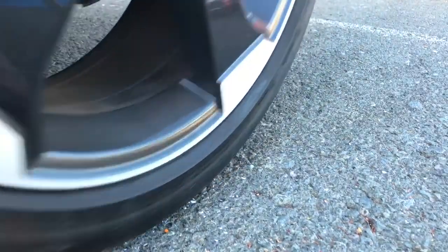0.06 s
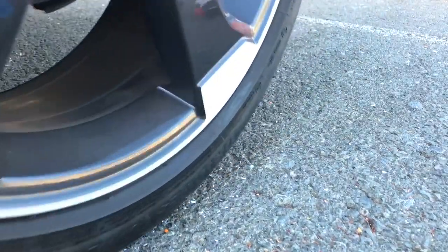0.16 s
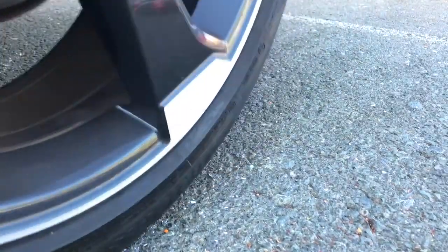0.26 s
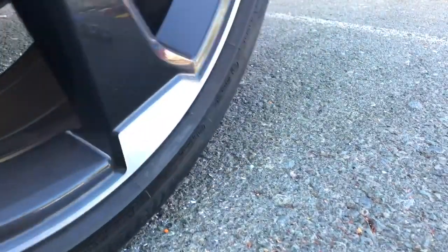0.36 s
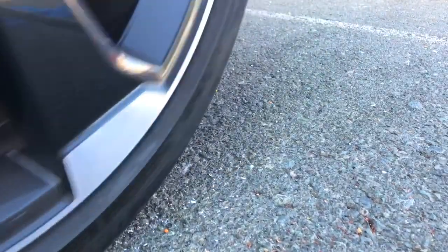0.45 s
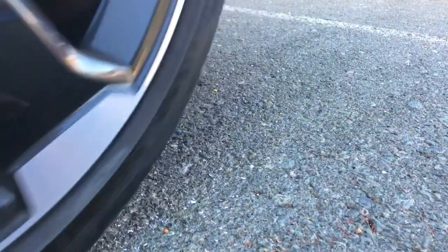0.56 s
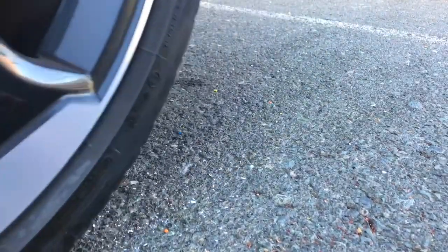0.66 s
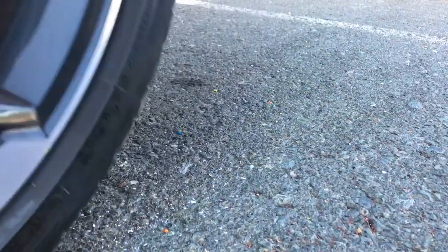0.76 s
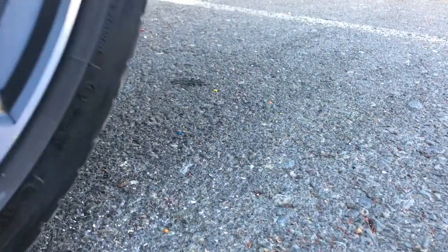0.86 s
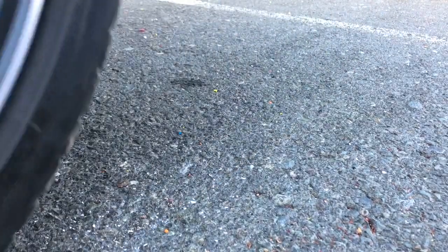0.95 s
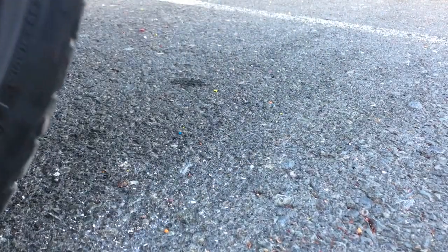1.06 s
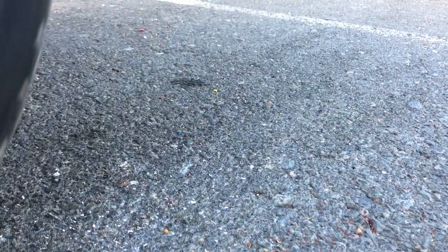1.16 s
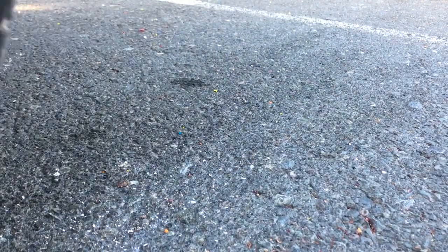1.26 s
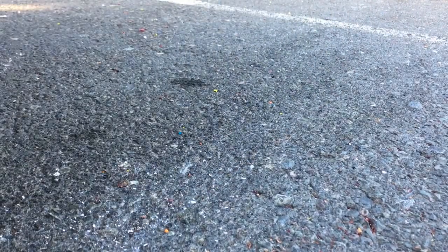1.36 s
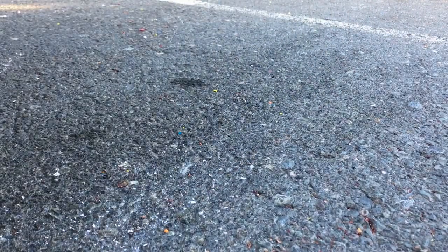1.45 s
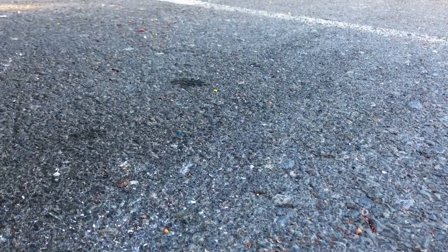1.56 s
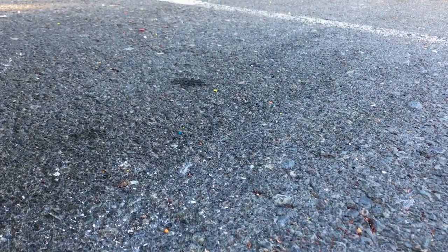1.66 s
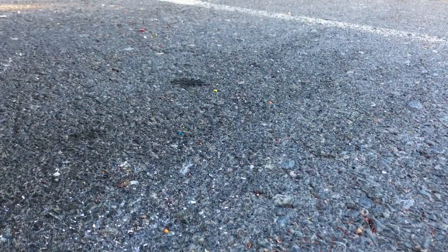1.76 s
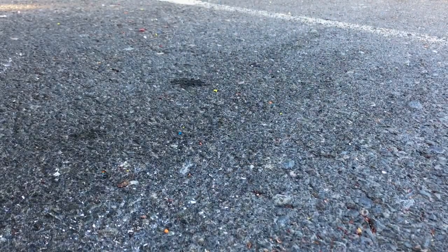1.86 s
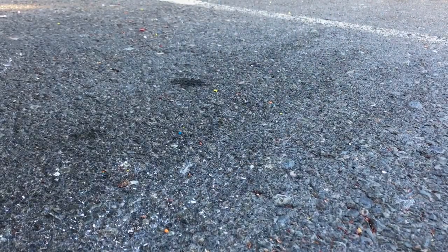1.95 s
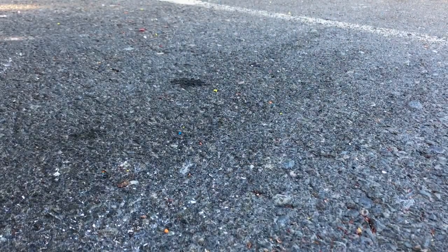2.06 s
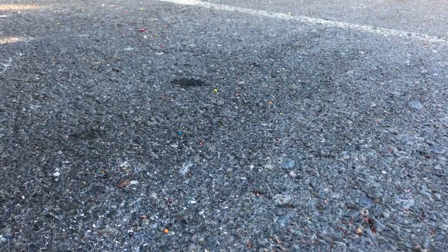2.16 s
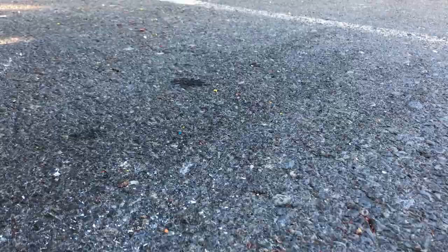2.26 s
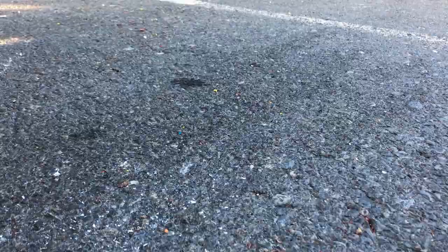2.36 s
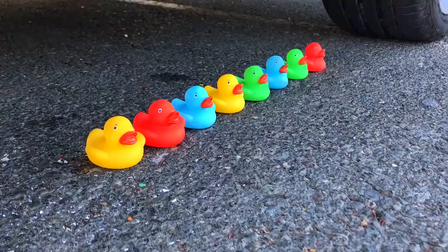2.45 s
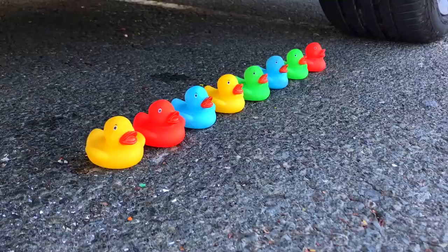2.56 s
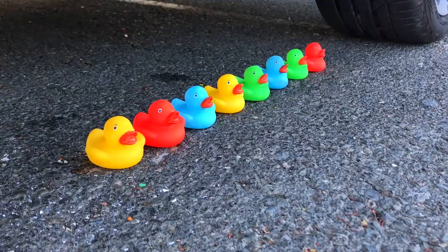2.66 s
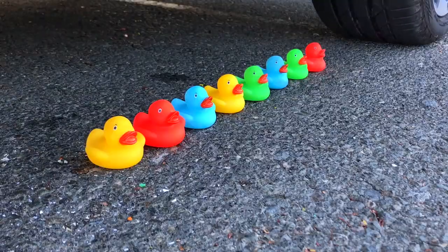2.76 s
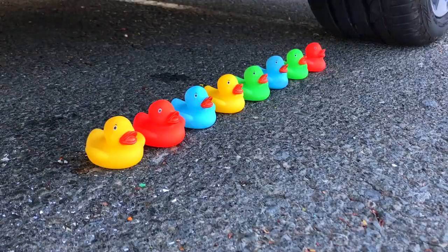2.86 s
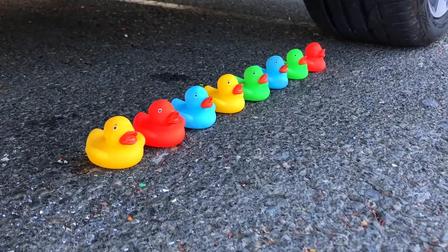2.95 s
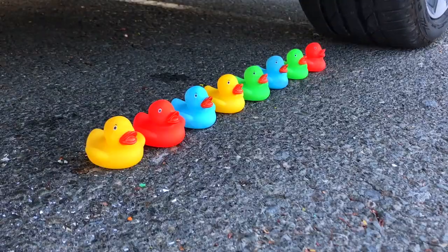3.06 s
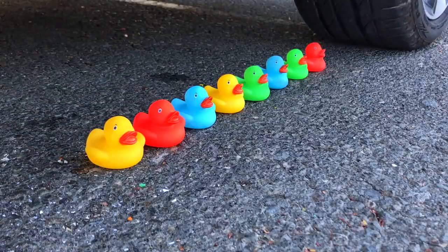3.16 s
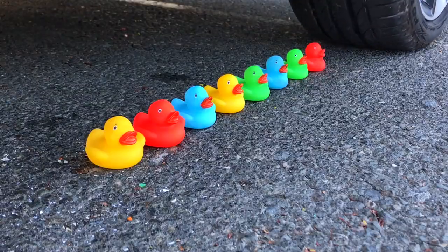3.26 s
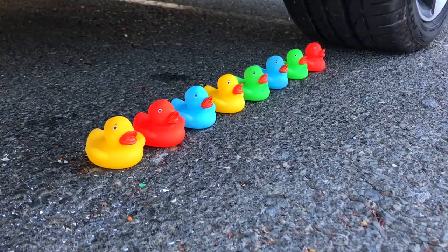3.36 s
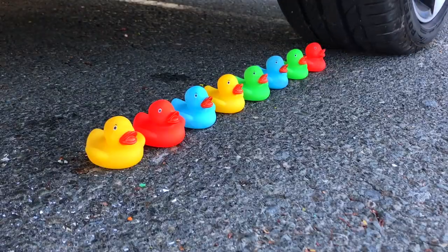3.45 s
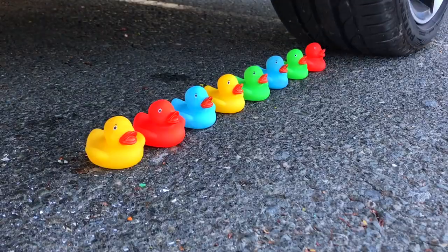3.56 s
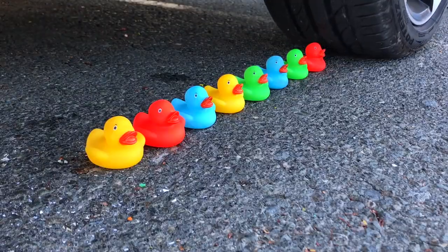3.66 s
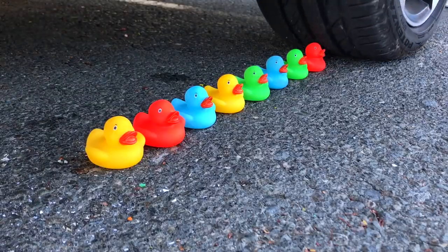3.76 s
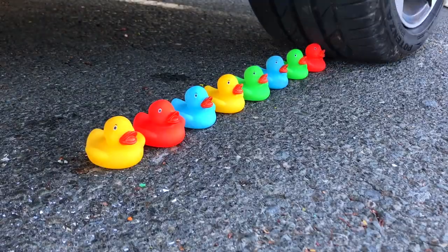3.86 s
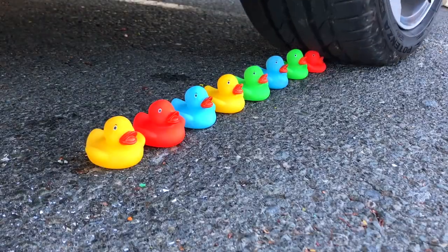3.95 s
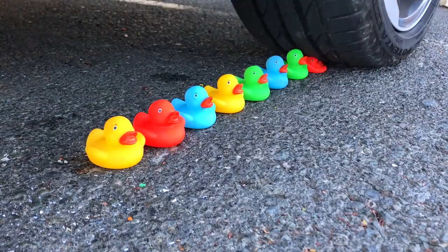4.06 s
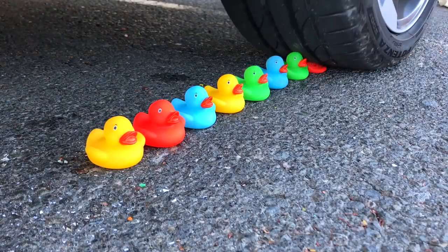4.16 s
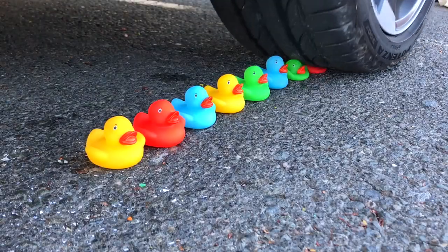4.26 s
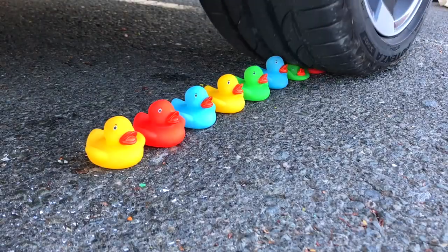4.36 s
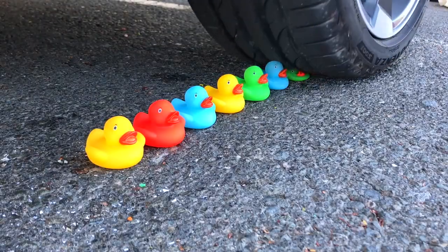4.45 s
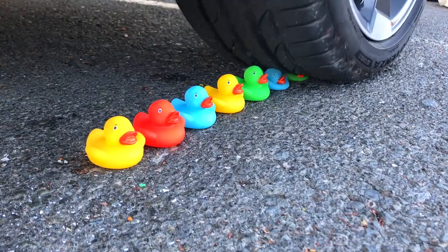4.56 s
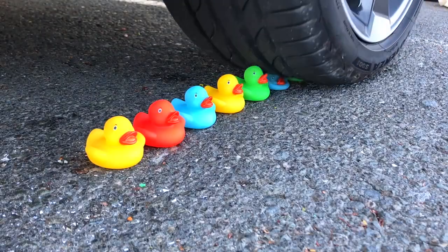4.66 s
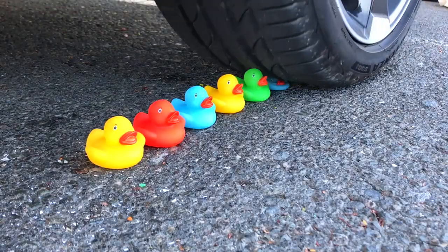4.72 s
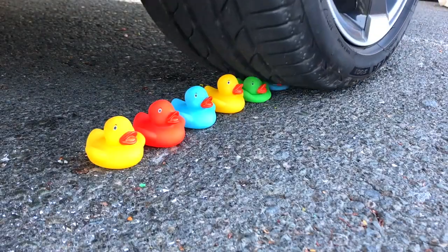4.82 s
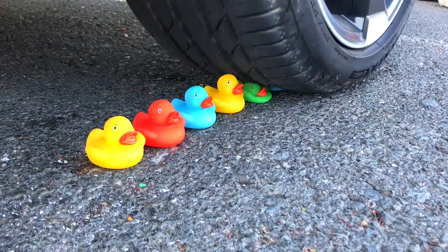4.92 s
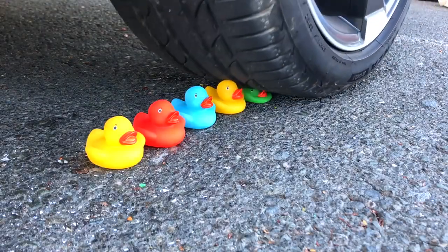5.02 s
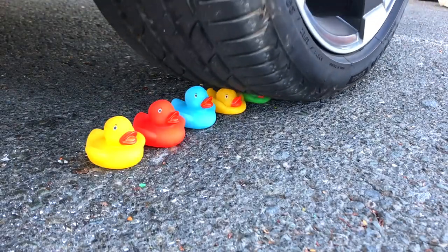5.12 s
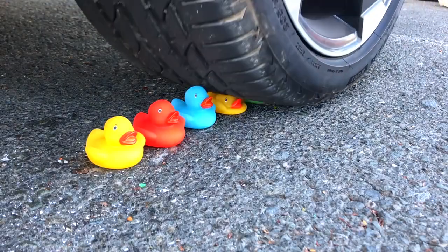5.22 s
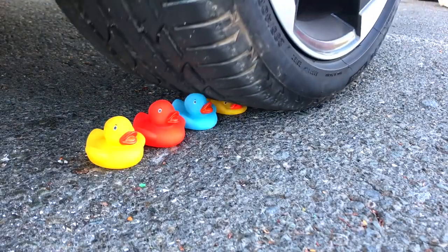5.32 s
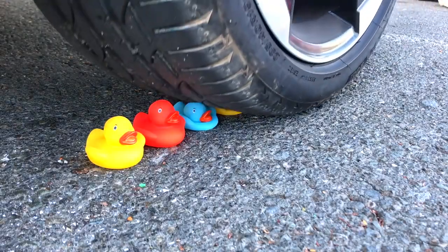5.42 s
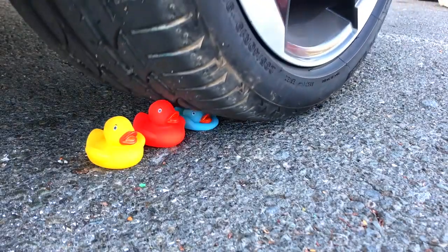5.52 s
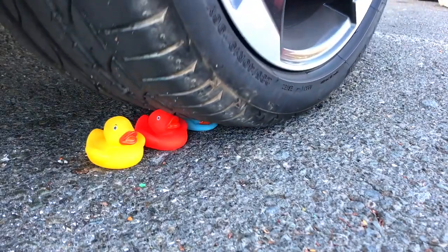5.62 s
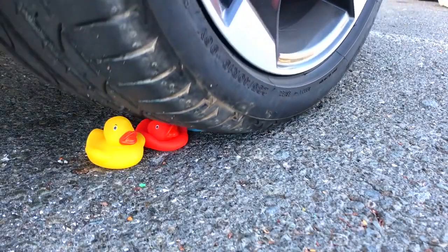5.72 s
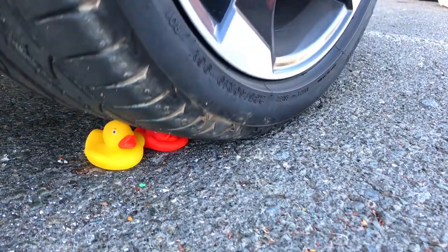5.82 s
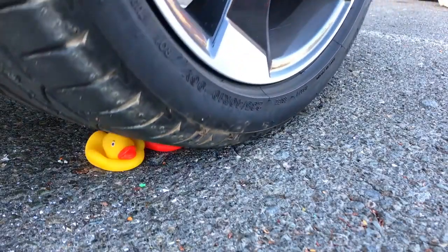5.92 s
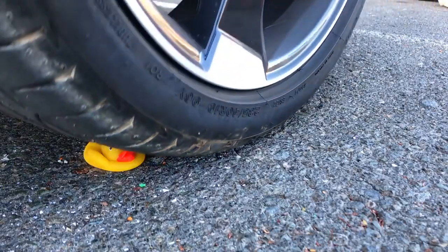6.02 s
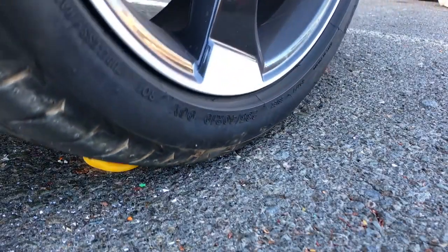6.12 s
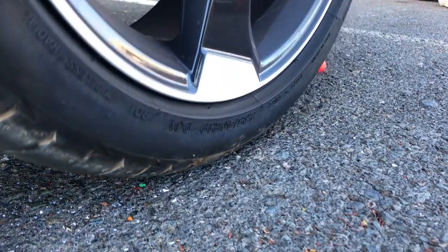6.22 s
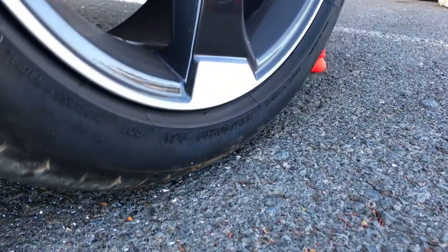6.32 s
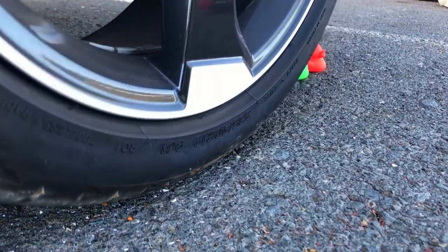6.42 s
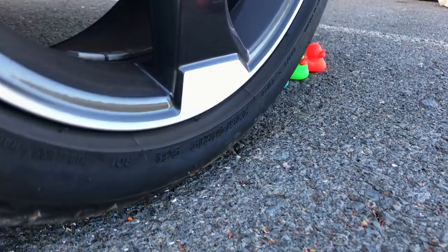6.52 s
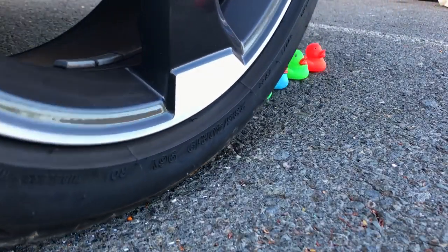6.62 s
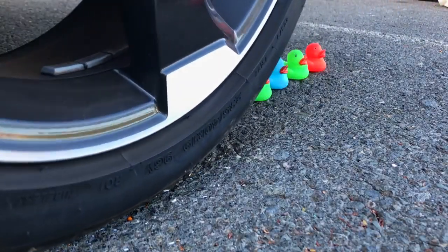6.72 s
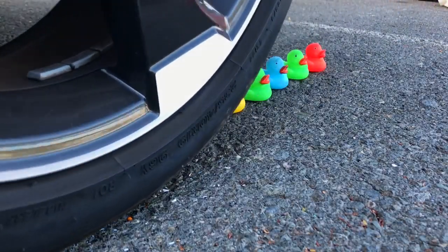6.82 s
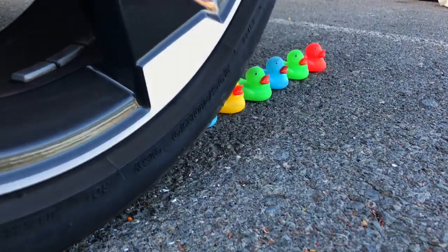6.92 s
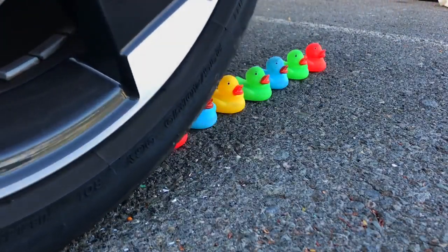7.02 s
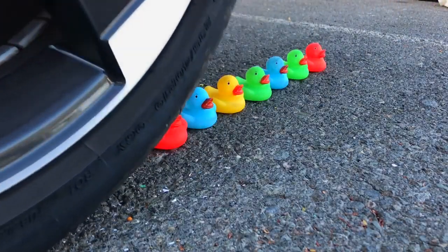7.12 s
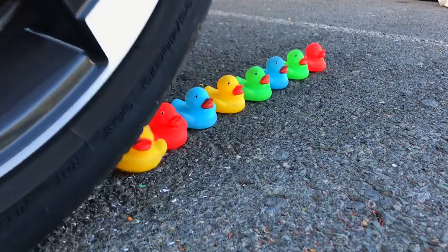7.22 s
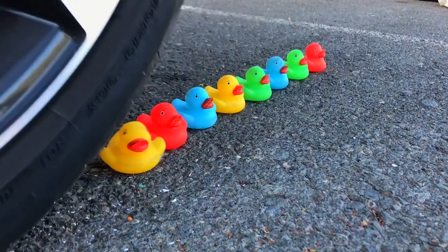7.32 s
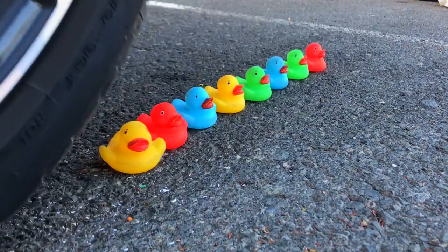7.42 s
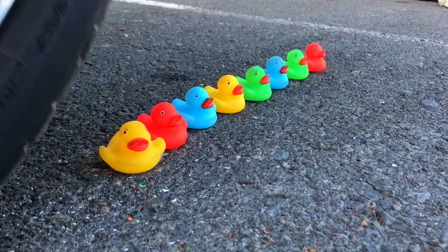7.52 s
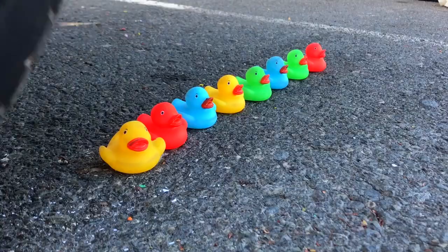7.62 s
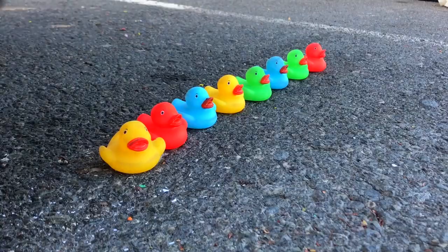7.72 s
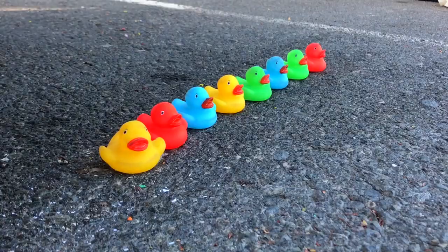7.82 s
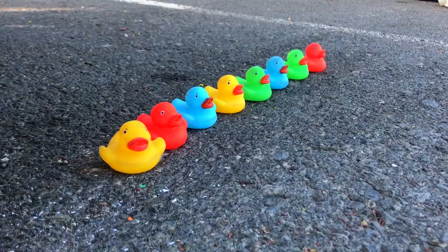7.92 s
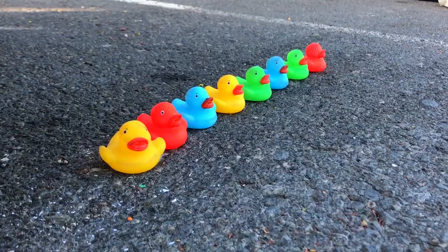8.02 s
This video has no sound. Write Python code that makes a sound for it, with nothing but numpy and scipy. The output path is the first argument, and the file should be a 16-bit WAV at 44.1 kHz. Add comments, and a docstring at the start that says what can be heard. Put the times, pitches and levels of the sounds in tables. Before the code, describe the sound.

Heard up close from road level, a tyre crushes hollow plastic in rapid, booming crunches that thin out into scattered sharp snaps. The idling car hums and rumbles softly on its own for a moment. Then the tyre presses over a line of rubber bath toys, which let out thin, gliding squeaks, chirps and airy hisses. A few small stones tick on the asphalt, and the toys wheeze faintly as they fill again.

```python
"""Tyre over plastic and bath toys

Two shots with a cut at 2.55 s, each of an idling car rolling slowly past a microphone on the asphalt.
In the first, a tyre crunches a row of hollow plastic things, loud enough to clip, and the pieces snap and
settle. In the second, a tyre flattens a row of rubber bath toys, whose air holes whistle and hiss as they
are squeezed and as they fill again."""
import sys
import numpy as np
from scipy import signal
from scipy.fft import rfft, irfft, next_fast_len
from scipy.io import wavfile
from scipy.ndimage import uniform_filter1d

SR = 44100
rng = np.random.default_rng(int(sys.argv[2]) if len(sys.argv) > 2 else 0)


def output_pcm(signal):
    """Save a mono or channel-first signal as 16-bit PCM at the path in sys.argv[1].

    Samples are clipped to [-1, 1] before scaling.
    """
    pcm = np.clip(np.atleast_2d(signal).T, -1, 1) * 32767
    wavfile.write(sys.argv[1], SR, np.round(pcm).astype(np.int16))


N = 356328
T = np.arange(N) / SR


def gain_of(db):
    """Decibels to amplitude."""
    return 10 ** (np.asarray(db) / 20)


def unit_rms(x):
    """Scales to unit rms."""
    return x / np.sqrt(np.mean(x ** 2) + 1e-20)


def curves(rows, t):
    """Reads every column of a curve table at the times t."""
    s, *values = np.transpose(rows)
    return [np.interp(t, s, v) for v in values]


def add(mix, s, sound):
    """Mixes a sound in at s seconds."""
    part = mix[max(round(s * SR), 0):][:len(sound)]
    part += sound[:len(part)]


def coloured(x, spectrum):
    """Shapes x by a spectrum of (Hz, dB) points, at unit rms."""
    hz, db = np.transpose(spectrum)
    size = next_fast_len(len(x))
    shape_db = np.interp(np.log(np.fft.rfftfreq(size, 1 / SR) + 1), np.log(hz), db, left=-80, right=-80)
    return unit_rms(irfft(rfft(x, size) * gain_of(shape_db), size)[:len(x)])


def wander(length, hz):
    """A smooth random curve of unit rms, changing about hz times a second."""
    span = max(int(SR / hz / 2), 1)
    noise = rng.standard_normal(length + 4 * span)
    return unit_rms(uniform_filter1d(uniform_filter1d(noise, span), span))[2 * span:][:length]


def resonate(x, hz, width):
    """A two-pole resonance of unit peak gain."""
    return signal.lfilter(*signal.iirpeak(hz, hz / width, SR), x)


# Hollow plastic going under the tyre. Each row: start in seconds, length in seconds, crackle level in dB,
# onset in dB against that level, boom drive in dB, the boom's peak as a share of the length.
PLASTIC_CRUNCHES = [(0.0, 0.032, -28.5, 7.5, -11, 0), (0.059, 0.065, -13, -8, -4.5, 0.054),
                    (0.172, .064, -10, -9, -4, 0), (0.302, 0.072, -11, -9.5, -8.5, 0.38),
                    (0.433, 0.077, -12.5, -4.5, -7, 0.038), (0.554, 0.075, -14, -7.5, -13.5, 0.036),
                    (0.682, .074, -13.5, -4.5, -8.5, 0.095), (0.806, 0.082, -6, -24, -6.5, 0.53),
                    (0.917, 0.14, -34, -6, -40, .5), (0.992, 0.035, -9.5, 5.5, -20, 0.57),
                    (1.02, 0.066, -10.5, -1.5, -0.5, 0.048), (1.259, 0.067, -9.5, -5.5, 2.5, 0.012),
                    (1.437, 0.13, -36.5, -18, -48, 0.45), (1.521, 0.07, -13.5, -5, -17.5, 0.12),
                    (1.84, 0.045, -15, -17.5, -27, .5), (2.175, 0.041, -27, 4.5, -35, 0.34)]


def crunch_envelopes():
    """The tyre bears down: strength of the crackle, of its treble and of the push on the hollow body."""
    crackle, treble, push = np.zeros((3, N))
    for start, length, db, onset_db, boom_db, boom_peak in PLASTIC_CRUNCHES:
        t = np.arange(start, start + length, 1 / SR)
        share = (t - start) / length
        crackle_db = db + np.interp(share, [0, 0.59, 1], [onset_db, 0, -9])
        treble_db = crackle_db - 5.5 - 0.5 * share
        push_db = boom_db - 27 * abs(share - boom_peak)
        fade = np.minimum(np.minimum(t - start, .002) / 0.0023, np.minimum(t[-1] - t, .016) / .016)
        add(crackle, start, gain_of(crackle_db) * fade)
        add(treble, start, gain_of(treble_db) * fade)
        add(push, start, gain_of(push_db) * fade)
    return crackle, treble, push


# Colour of the cracking at the microphone. Each row: frequency in Hz, relative level in dB.
CRACKLE_SPECTRUM = [(240, 2.5), (400, -10.5), (1040, -9.5), (1760, -7), (2430, -10.5), (4180, -11),
                    (4800, -13), (6050, -12.5), (7630, -20.5), (8370, -13.5), (10500, -23), (12700, -17.5),
                    (16000, -23.5)]
# Ringing of the crushed walls. Each row: frequency in Hz, bandwidth in Hz, relative level in dB.
WALL_MODES = [(1880, 770, -9.5), (3043, 29, -16), (3320, 26, -19.5), (5320, 130, -12)]


def plastic_crackle(strength, treble):
    """Dense cracking in clumps, then stray crackle as the plastic settles; the walls ring on."""
    cracks = rng.standard_normal(N) * gain_of(2.7 * wander(N, 186) + 4.17 * wander(N, 885))
    cracks = coloured(cracks, CRACKLE_SPECTRUM)
    low = signal.sosfiltfilt(signal.butter(2, 6000, fs=SR, output="sos"), cracks)
    impulses = (rng.random(N) < 160 / SR) * gain_of(1.3 * np.minimum(rng.exponential(1, N), 3))
    bursts = signal.oaconvolve(impulses, np.exp(-T[:600] / 0.0038))[:N]
    decay = gain_of(-55 / SR)  # the settling dies away by 55 dB a second
    unrest = signal.lfilter([.001], [1, -decay ** 2], strength ** 2) ** .5
    settling = gain_of(-31.5) * unrest * bursts * cracks
    body = strength * unit_rms(low) + settling
    ring = sum(gain_of(db) * resonate(body, hz, width) * np.sqrt(2000 / width)
               for hz, width, db in WALL_MODES)
    return body + ring + treble * unit_rms(cracks - low)


# The hollow body under the tyre. Each row: frequency in Hz, bandwidth in Hz, relative level in dB.
HOLLOW_MODES = [(90.3, 15.4, 4.5), (153.8, 21, -4.5), (208.8, 10.7, 2), (259.3, 18, -11.5),
                (296.5, 39, 4.5), (562, 31, -6)]


def hollow_boom(push):
    """Each crunch shakes the low resonances of the hollow body."""
    shake = push * rng.standard_normal(N)
    boom = sum(gain_of(db) * resonate(resonate(shake, hz, 4 * width), hz, width) / np.sqrt(width)
               for hz, width, db in HOLLOW_MODES)
    return gain_of(37) * boom


# Single pieces snapping near the microphone. Each row: time in seconds, level in dB, knock pitch in Hz,
# relative level of the tick in dB.
PLASTIC_SNAPS = [(0.062, 1.5, 705, -20), (0.141, -15, 2210, -12), (0.174, 1, 1800, -16),
                 (0.195, 7, 2150, 3.5), (0.296, -8.5, 2260, -1), (0.305, -6.5, 1770, -3),
                 (0.437, -3, 1610, 3.5), (0.488, -5, 1900, 4), (0.556, -8, 1860, -11),
                 (0.681, -4, 1900, -6), (0.775, 1.5, 1440, -32), (0.805, 4.5, 1670, 3),
                 (0.836, 3, 2100, -3), (0.954, -25, 1930, -5), (0.989, -2, 1560, 2), (0.998, -15, 1740, -4),
                 (1.191, -31, 2000, -17), (1.214, -7.5, 2020, 11), (1.24, -3, 2040, -21),
                 (1.264, 8.5, 1550, -17), (1.349, -18.5, 773, -20), (1.48, -26, 1550, 4),
                 (1.526, -11.5, 1800, 10.5), (1.606, -6, 1300, -45), (1.682, -3.5, 1550, -14),
                 (1.741, -21, 1950, -24), (1.765, -2, 1510, -3.5), (1.801, -11, 2030, -6),
                 (1.855, -2.5, 950, -15), (1.967, -8.5, 2190, 3.5), (2.003, -19, 1330, 1),
                 (2.021, -17.5, 1360, 0), (2.05, -17.5, 2150, 2), (2.088, -24, 2250, -5),
                 (2.133, -17.5, 1340, 5.5), (2.153, -5, 2060, -10), (2.16, -5, 1090, -14),
                 (2.184, -7, 2260, 4), (2.318, -27.5, 1850, -28), (2.371, -30, 1660, -17),
                 (2.456, -5.5, 930, -16), (2.498, -11, 1160, -35), (2.519, -10, 920, -41)]
# Colour of one piece cracking. Each row: frequency in Hz, relative level in dB.
SHARD_SPECTRUM = [(240, -40), (400, -15), (547, -6), (1530, 0), (1810, -25), (2120, -6), (6330, -13.5),
                  (7500, -29), (9000, -15), (11700, -58), (19800, -120)]


def snaps():
    """A piece gives way: a sharp crack with a short rattle, a knock of a few cycles and a bright tick."""
    out, t = np.zeros(N), np.arange(SR // 8) / SR
    highpass = signal.butter(2, 5000, "high", fs=SR, output="sos")
    for start, db, hz, tick_db in PLASTIC_SNAPS:
        crack, shake, tick = rng.standard_normal((3, len(t)))
        rattle = 0.34 * gain_of(-60 * t / 0.085 + 4.1 * wander(len(t), 330))
        fall = gain_of(-60 * t / 0.013) + rattle
        knock = resonate(shake * gain_of(-60 * t / .03), hz, .18 * hz)
        crack = 0.2 * coloured(crack, SHARD_SPECTRUM)
        tick = gain_of(tick_db - 11) * unit_rms(signal.sosfilt(highpass, tick))
        add(out, start, gain_of(db) * (0.6 * knock / abs(knock).max() + (crack + tick) * fall))
    return out


def edge_tone(rows, partials_db=()):
    """Start time and sound of air whistling at a hole; the weaker the flow, the more it breaks up."""
    t = np.arange(rows[0][0], rows[-1][0], 1 / SR)
    n = len(t)
    hz, db = curves(rows, t)
    weak = np.clip((-18.5 - db) / 25, 0, 1)
    waver = (.006 + 0.0033 * weak) * wander(n, 40) + .004 * wander(n, 200)
    phase = 2 * np.pi * np.cumsum(hz * (1 + waver)) / SR
    # a narrow and a wide band of air noise wrap the tone
    narrow, wide = (wander(n, spread_hz) + 1j * wander(n, spread_hz) for spread_hz in (500, 2500))
    breath = (0.15 + 0.091 * weak) * narrow + (0.015 + 0.024 * weak) * wide
    tone = np.real(np.exp(1j * phase) * (1 + breath))
    for multiple, partial_db in zip((.5, 1.5, 2), partials_db):
        flutter = gain_of(partial_db + 1.7 * wander(n, 120)) * (multiple * hz < SR / 2)
        tone += flutter * np.real(np.exp(1j * multiple * phase) * (1 + 0.18 * narrow))
    fade = np.minimum(np.minimum(t - t[0], t[-1] - t) / 0.0021, 1)
    # the flow flutters, and now and then chokes for a moment
    flutter_db = (2.2 + 2 * weak) * wander(n, 70)
    choke_db = 7 * np.clip(wander(n, 45) - 1.4 + .5 * weak, 0, 2)
    return t[0], np.sqrt(2) * gain_of(db + flutter_db - choke_db) * fade * tone


# Long whistles of the air holes, one list each. Each row: time in seconds, pitch in Hz, level in dB.
WHISTLE_CURVES = [
    [(4.008, 6900, -25.5), (4.087, 8520, -11), (4.156, 9350, -16.5), (4.166, 8600, -13), (4.175, 6270, -53)],
    [(4.275, 7600, -22.5), (4.3, 9500, -9), (4.33, 9740, -8), (4.36, 9230, -21.5), (4.404, 9480, -10),
     (4.415, 8500, -18), (4.439, 6400, -39)],
    [(4.567, 11010, -15), (4.603, 13130, -10.5), (4.63, 13100, -12.5), (4.668, 12800, -13.5),
     (4.695, 13400, -18)],
    [(4.868, 7400, -31), (4.94, 7300, -26), (4.988, 7630, -33), (5.0, 5450, -53), (5.02, 2800, -50)],
    [(5.112, 6100, -35.5), (5.153, 7440, -17.5), (5.185, 7900, -17.5), (5.222, 7930, -15),
     (5.237, 8270, -9), (5.269, 8120, -20), (5.276, 7080, -33), (5.292, 6400, -34)],
    [(5.338, 7440, -47), (5.435, 7300, -39), (5.462, 7600, -39), (5.483, 9080, -24), (5.529, 8600, -24),
     (5.6, 7700, -36), (5.622, 8100, -32), (5.652, 6600, -45), (5.679, 7200, -31)],
    [(5.752, 7000, -26), (5.79, 7130, -27), (5.815, 7780, -18), (5.837, 8010, -17), (5.841, 6900, -36),
     (5.862, 4200, -33)],
    [(5.962, 10600, -4), (5.99, 11730, -6), (6.012, 11860, -9), (6.034, 11600, -12.5)],
    [(6.028, 7670, -23), (6.082, 7300, -21), (6.097, 7570, -22.5), (6.118, 6400, -46)],
    [(6.425, 8080, -38), (6.457, 8580, -32), (6.476, 9290, -31)],
    [(6.478, 8580, -28), (6.568, 8400, -22), (6.586, 8160, -25.5), (6.631, 6860, -36), (6.655, 4240, -36)],
    [(6.801, 5700, -34), (6.86, 6700, -31.5), (6.9, 7640, -31), (6.93, 7270, -32), (6.951, 8310, -22),
     (7.008, 7300, -34), (7.024, 8030, -31), (7.058, 9670, -19), (7.09, 10500, -17.5),
     (7.135, 11000, -20.5), (7.155, 9700, -23), (7.173, 8970, -18), (7.221, 8580, -20), (7.269, 4100, -53)],
]
# Their partials, a row to a whistle. Each row: levels in dB against the main tone at half the pitch,
# at 1.5 times the pitch and at the octave.
WHISTLE_PARTIALS = [(-60, -42, -0.5), (-60, -60, -9), (-60, -60, -60), (-15, 3.5, 4), (-60, -60, -2),
                    (-60, -60, -60), (-60.5, -60, -1.5), (-60, -58, -61.5), (-29, -13.5, -4), (3, -18, -60),
                    (-21, -60, -60), (-60, -60, -58.5)]


def whistles():
    """Air streams through a toy's hole in a long, gliding tone."""
    out = np.zeros(N)
    for rows, partials_db in zip(WHISTLE_CURVES, WHISTLE_PARTIALS):
        add(out, *edge_tone(rows, partials_db))
    return out


# Short peeps of the toys. Each row: start in seconds, length in seconds, first, middle and last pitch
# in Hz, level in dB at the highest pitch.
TOY_PEEPS = [(4.173, 0.051, 9430, 8450, 7850, -29.5), (4.69, .021, 8500, 8750, 7000, -18.5),
             (4.712, .032, 10800, 11100, 11400, -24.5), (4.733, .025, 10500, 7900, 7000, -33),
             (5.291, .05, 8500, 8700, 9350, -41), (5.546, 0.053, 6000, 5470, 4120, -34.5),
             (5.7, 0.087, 3720, 4160, 3850, -34), (5.789, 0.056, 3845, 3840, 3020, -32),
             (5.7, .026, 7400, 6550, 5000, -29), (5.882, 0.028, 9900, 9100, 7770, -20.5),
             (5.873, 0.21, 7240, 7700, 8300, -32), (6.171, .098, 8500, 9800, 8400, -38),
             (6.172, 0.079, 3480, 4160, 3570, -29), (6.268, 0.098, 5680, 5500, 5600, -41.5),
             (6.337, 0.083, 6400, 7900, 6950, -33), (6.341, 0.042, 3330, 3640, 3940, -35),
             (6.366, .045, 5830, 4700, 3700, -32), (6.655, 0.054, 4670, 4560, 4500, -38),
             (6.696, 0.12, 4760, 5300, 4450, -41), (6.677, .06, 11400, 12000, 13400, -34),
             (6.74, .074, 13400, 12400, 10000, -40), (6.774, .013, 5750, 7950, 9250, -28),
             (6.999, .05, 3740, 3670, 3220, -32.5), (7.028, 0.062, 5840, 5000, 3100, -31),
             (7.09, 0.098, 5400, 5500, 5000, -42), (7.182, 0.09, 13400, 12600, 8600, -45),
             (7.199, 0.052, 4500, 4090, 3380, -33.5), (6.171, .093, 5300, 5700, 5200, -51),
             (5.33, .09, 4240, 3760, 3900, -43.5), (5.584, 0.067, 3900, 3470, 3170, -37),
             (7.357, 0.0069, 8350, 7960, 8600, -32)]


def peeps(db_per_octave=17):
    """A peep glides through three pitches and weakens as its pitch sinks with the flow."""
    out = np.zeros(N)
    for start, length, *pitches, db in TOY_PEEPS:
        times = start + length * np.array([0, .5, 1])
        levels_db = db + db_per_octave * np.log2(np.array(pitches) / max(pitches))
        add(out, *edge_tone(np.transpose([times, pitches, levels_db])))
    return out


# The tyre bears down on a toy. Each row: start in seconds, length in seconds, air level in dB, chirp
# length in seconds, the chirp's first and last pitch in Hz, chirp level in dB, rasp level in dB.
TOY_SQUEEZES = [(3.993, .18, -35, 0.015, 8200, 9860, -17.5, -37),
                (4.261, 0.16, -34.5, 0.02, 8480, 12500, -26.5, -45),
                (4.536, 0.22, -39, 0.033, 8730, 10540, -17.5, -44),
                (4.837, .17, -30.5, 0.037, 8770, 11000, -19.5, -26.5),
                (5.104, 0.2, -32.5, 0.017, 8830, 10200, -11, -36),
                (5.681, 0.056, -28.5, 0.024, 8900, 11200, -15.5, -28),
                (5.739, .115, -32.5, .015, 9400, 10960, -13.5, -46),
                (5.854, 0.066, -38, 0.033, 8870, 9800, -19, -38),
                (5.942, 0.2, -37, .022, 8300, 10700, -18, -34)]


def chirps():
    """Each squeeze opens with a quick rising whistle."""
    out = np.zeros(N)
    for start, _, _, length, first_hz, last_hz, db, _ in TOY_SQUEEZES:
        add(out, *edge_tone([(start, first_hz, db), (start + length, last_hz, db)], partials_db=[-27.5]))
    return out


# Stray spurts of air. Each row: start and length in seconds, centre and width in Hz, level in dB.
AIR_RASPS = [(4.582, 0.11, 7630, 1200, -35), (4.992, .012, 9000, 900, -29),
             (6.338, 0.015, 3530, 700, -33.5), (6.614, 0.019, 3420, 400, -40),
             (7.357, .006, 9500, 5000, -39)]


def rasps(lead_s=.004, length_s=.018, centre_hz=4340, width_hz=1200):
    """Air too turbulent for a tone: the stray spurts, and one leading into each squeeze."""
    out = np.zeros(N)
    openings = [(start - lead_s, length_s, centre_hz, width_hz, db) for start, *_, db in TOY_SQUEEZES]
    for start, length, hz, width, db in [*AIR_RASPS, *openings]:
        air = resonate(resonate(rng.standard_normal(int(length * SR)), hz, width), hz, width)
        add(out, start, gain_of(db) * unit_rms(air) * signal.windows.tukey(len(air), .4))
    return out


# Stretches of soft hiss as the toys refill, with brief dropouts in the sound.
# Each row: start in seconds, length in seconds, level in dB.
REFILL_HISS = [(4.16, 0.14, -45), (5.402, 0.23, -30), (6.1, 0.51, -46), (6.59, 0.32, -37),
               (6.876, 0.21, -38), (7.1, .22, -52)]


def hiss_envelope(shut_s=0.017):
    """Level of the hiss: each squeeze spurts, holds, spurts and shuts; the refills hiss softly."""
    out = np.zeros(N)
    for start, length, db, *_ in TOY_SQUEEZES:
        t = np.arange(0, length + 3 * shut_s, 1 / SR)
        spurts_db = 4 * np.exp(-t / .03) + 3 * np.exp(-abs(length - t) / 0.013)
        shut_db = 20 * np.maximum(t - length, 0) / shut_s
        add(out, start, gain_of(db + spurts_db - shut_db) * np.minimum(t / .006, 1))
    for start, length, db in REFILL_HISS:
        add(out, start, gain_of(db) * np.hanning(int(length * SR)) ** 0.6)
    return out


# Colour of the jet at an air hole. Each row: frequency in Hz, relative level in dB.
JET_SPECTRUM = [(2000, -21.5), (3800, -9), (5500, -15.5), (7500, -7.5), (11000, -1.5), (15500, -4)]


def air_rush():
    """Turbulent air hisses unevenly, in patches that drift over time and pitch."""
    jet = coloured(rng.standard_normal(N), JET_SPECTRUM)
    frames = signal.stft(jet, nperseg=256, noverlap=192)[2]
    patches = rng.standard_normal(frames.shape)
    for _ in range(2):
        patches = uniform_filter1d(uniform_filter1d(patches, size=5, axis=0), size=20, axis=1)
    hiss = signal.istft(frames * gain_of(4.8 * unit_rms(patches)), nperseg=256, noverlap=192)[1][:N]
    return unit_rms(hiss) * gain_of(2.5 * wander(N, 84)) * hiss_envelope()


# Small stones on the asphalt. Each row: time in seconds, level in dB, pitch in Hz.
STONE_TICKS = [(4.848, -25.5, 1270), (4.859, -26.5, 1460), (4.868, -23, 1980), (4.903, -32, 990),
               (6.293, -27.5, 1470), (6.553, -30, 980), (6.728, -28, 960), (7.465, -36.5, 710)]


def grit():
    """A stone under the tread gives a dry, wide tick with a dull knock in it."""
    out, t = np.zeros(N), np.arange(SR // 50) / SR
    for start, db, hz in STONE_TICKS:
        tick = coloured(rng.standard_normal(len(t)), [(500, -8), (3000, -5), (8000, -25)])
        knock = np.sin(2 * np.pi * hz * t)
        add(out, start, gain_of(db - 60 * t / 0.031) * (1.1 * knock + 1.26 * tick))
    return out


# The idle in the second shot, heard from road level. Each row: time in seconds, firing rate in Hz,
# level in dB of orders 2 and 3, of order 5 and of order 6.
IDLE_CURVES = [(2.55, 29.89, -49.5, -54.5, -77), (3.9, 29.84, -37.5, -42, -47),
               (5.28, 30.08, -40, -55, -43), (6.28, 29.27, -40, -63, -58), (7.28, 29.1, -33, -53, -59),
               (8.08, 29.6, -41.5, -66, -60)]


def engine_hum():
    """Low orders of the firing rate, heard from the cut on; also returns the firing count."""
    firing_hz, low_db, fifth_db, sixth_db = curves(IDLE_CURVES, T)
    firings = np.cumsum(firing_hz) / SR
    fade_in = np.clip((T - IDLE_CURVES[0][0]) / 0.018, 0, 1)
    hum = np.zeros(N)
    for order, db in [(2, low_db), (3, low_db), (5, fifth_db), (6, sixth_db)]:
        level = gain_of(db + 0.5 * wander(N, 6))
        hum += level * np.sin(2 * np.pi * order * firings + .5 * wander(N, 3.93))
    return np.sqrt(2) * fade_in * hum, firings


# Car noise at the microphone, one list for each shot, with the cut at 2.55 s.
# Each row: time in seconds, rumble in dB, body noise in dB, hiss in dB.
CAR_LEVELS = [
    [(0, -20.5, -32, -45.5), (1.1, -25, -31, -46), (1.45, -30, -42.5, -58), (2.25, -46, -51, -65),
     (2.55, -39, -45, -55)],
    [(2.55, -45.5, -45.5, -57.5), (3.45, -53, -46, -57), (3.8, -39.5, -38, -49.5), (6.06, -41, -38, -49),
     (7.17, -37, -38.5, -56), (7.6, -39.5, -41.5, -54), (8.08, -41.5, -47, -62)],
]
# Colours of the rumble, the body noise and the hiss. Each row: frequency in Hz, relative level in dB.
RUMBLE_SPECTRUM = [(21, -24.5), (35, -9.5), (55, 0.5), (70, -4.5), (156, -8.5), (211, -18.5), (260, -21),
                   (340, -64), (570, -120)]
BODY_SPECTRUM = [(120, -33), (200, -3.5), (268, -6), (338, -0.5), (521, -7), (608, -1), (667, -5.5),
                 (743, -7.5), (1270, -8.5), (1510, -10), (1710, -8.5), (1990, -9.5), (8000, -22),
                 (10400, -38), (17600, -120)]
HISS_SPECTRUM = [(3530, -9), (6000, -30), (9740, -8), (10500, -13.5), (11100, -8), (12700, -4.5),
                 (13900, -12), (15200, -8.5), (16000, -11)]


def car():
    """The idling car hums and rumbles; its body noise and hiss throb once a firing."""
    hum, firings = engine_hum()
    throb = np.cos(2 * np.pi * (firings + 0.18))
    rumble_db, body_db, hiss_db = curves(np.concatenate(CAR_LEVELS), T)
    rumble, body, hiss = rng.standard_normal((3, N))
    rumble = gain_of(rumble_db) * coloured(rumble, RUMBLE_SPECTRUM)
    body = gain_of(body_db + 0.89 * throb + 0.72 * wander(N, 13.8)) * coloured(body, BODY_SPECTRUM)
    hiss = gain_of(hiss_db + 2.7 * throb) * coloured(hiss, HISS_SPECTRUM)
    return hum + rumble + body + hiss


def road_scatter(x):
    """Short scatter between road and underside: a dull burst and a faint, slightly longer bright tail."""
    t = np.arange(SR // 3) / SR
    taps = rng.standard_normal((2, len(t))) * (t > .003)
    dull = signal.sosfilt(signal.butter(2, 3500, fs=SR, output="sos"), taps[0]) * gain_of(-60 * t / 0.096)
    tail = dull + 0.13 * taps[1] * gain_of(-60 * t / 0.14)
    return signal.oaconvolve(x, tail / np.linalg.norm(tail))[:N]


def scene():
    """The plastic shot, then the toy shot, each heard from a microphone on the asphalt."""
    strength, treble, push = crunch_envelopes()
    crackle = plastic_crackle(strength, treble)
    boom = hollow_boom(push)
    plastic = crackle + snaps()
    toys = air_rush() + whistles() + peeps() + chirps() + rasps()
    scatter = gain_of(-18.5) * road_scatter(plastic) + gain_of(-6.5) * road_scatter(toys)
    return (plastic + boom + toys + scatter + grit() + car())[None]


def record(dry):
    """The microphone drops the deepest bass, the loudest crunches clip, and the top treble is cut."""
    thinned = signal.sosfilt(signal.butter(3, 40, "high", fs=SR, output="sos"), dry)
    clipped = thinned / (1 + abs(thinned) ** 8) ** (1 / 8)
    lowpass = signal.firwin(401, 15950, window=("kaiser", 9), fs=SR)
    return signal.oaconvolve(clipped, lowpass[None], "same")


dry = scene()
out = record(dry)
output_pcm(out)
```